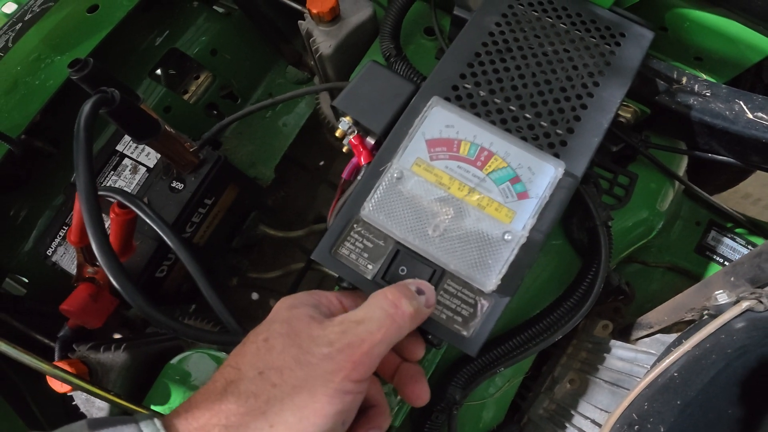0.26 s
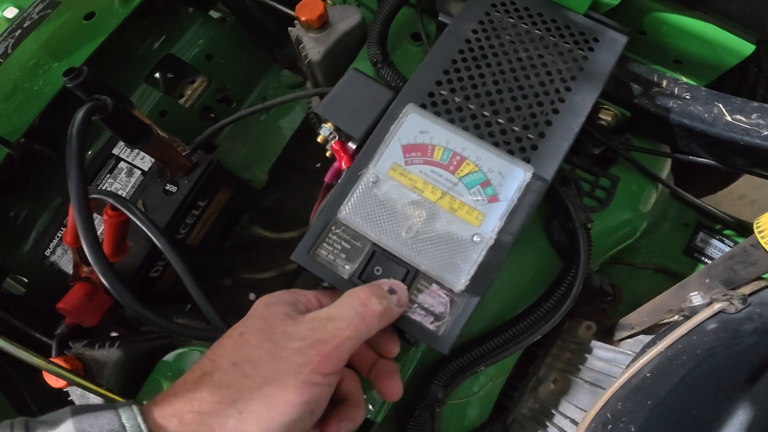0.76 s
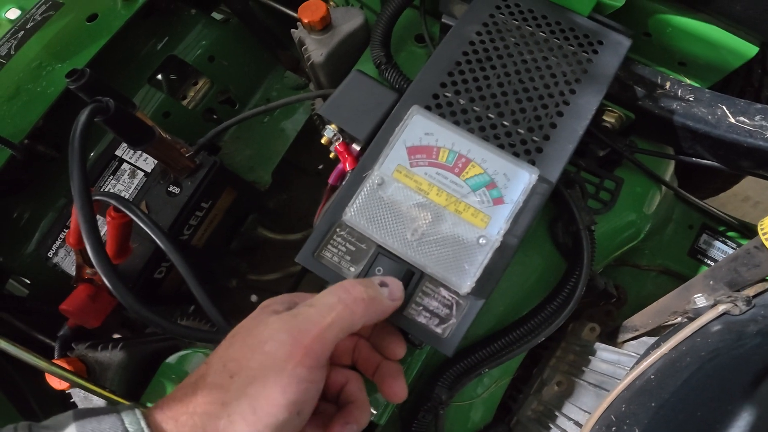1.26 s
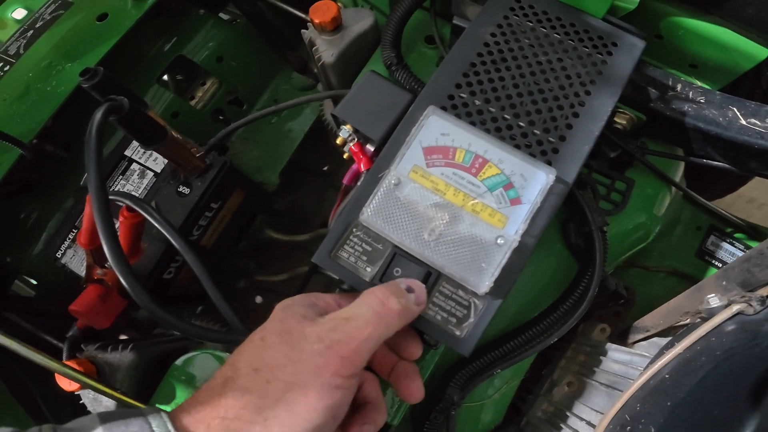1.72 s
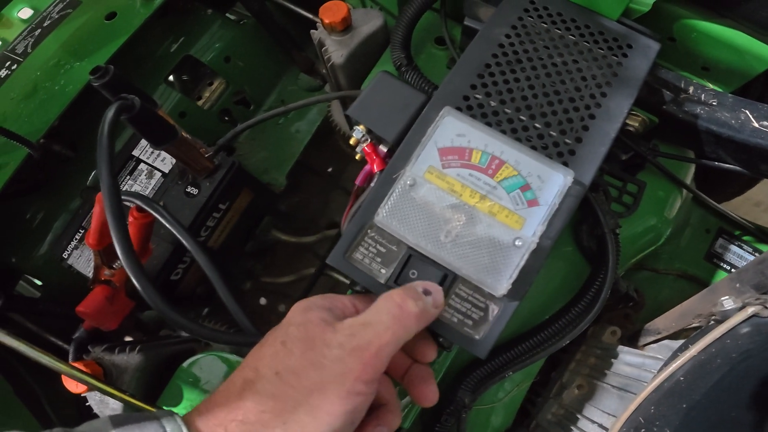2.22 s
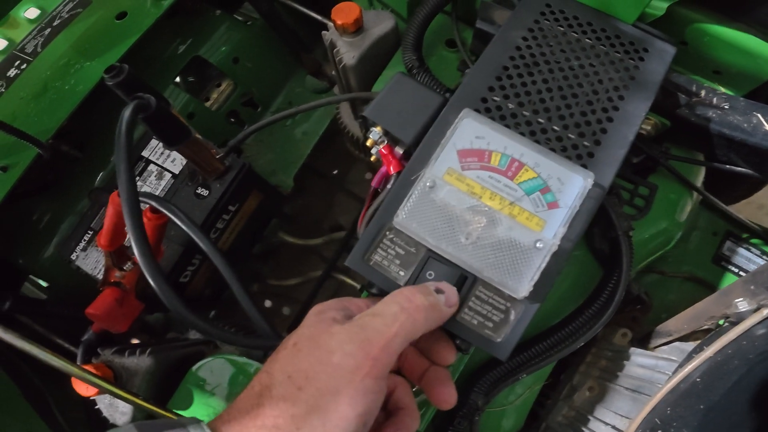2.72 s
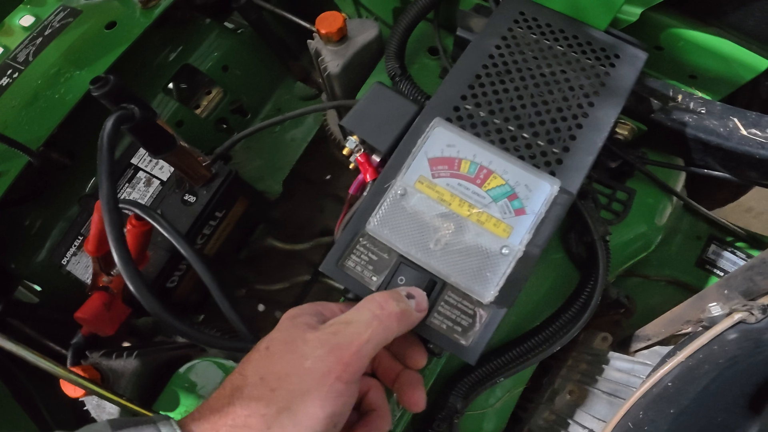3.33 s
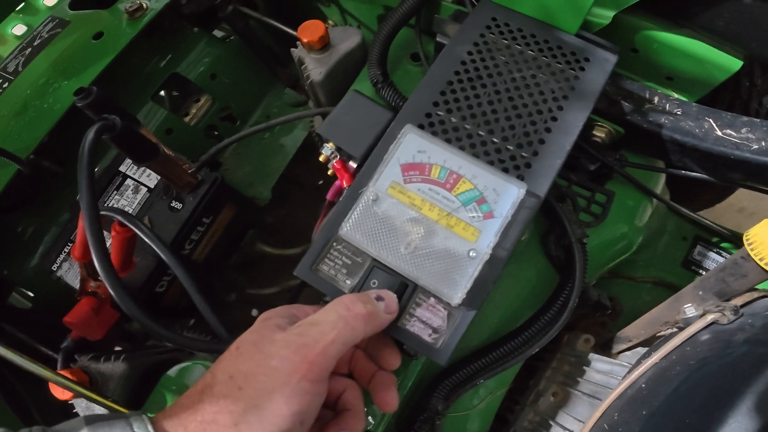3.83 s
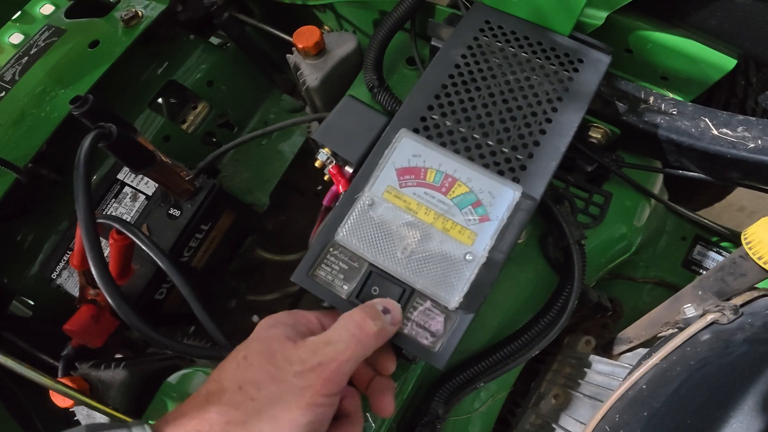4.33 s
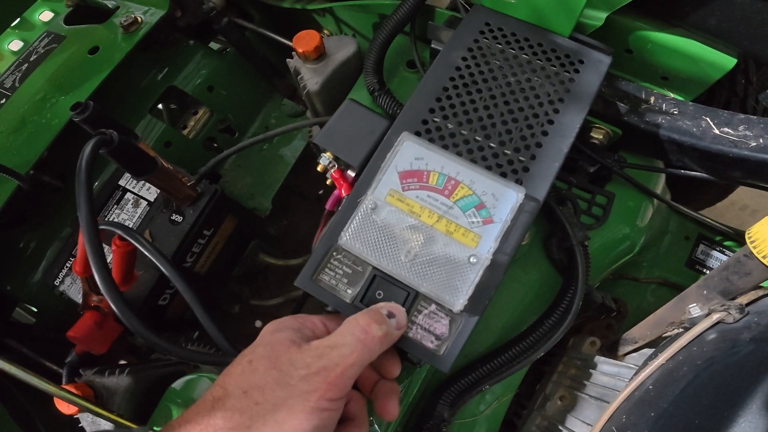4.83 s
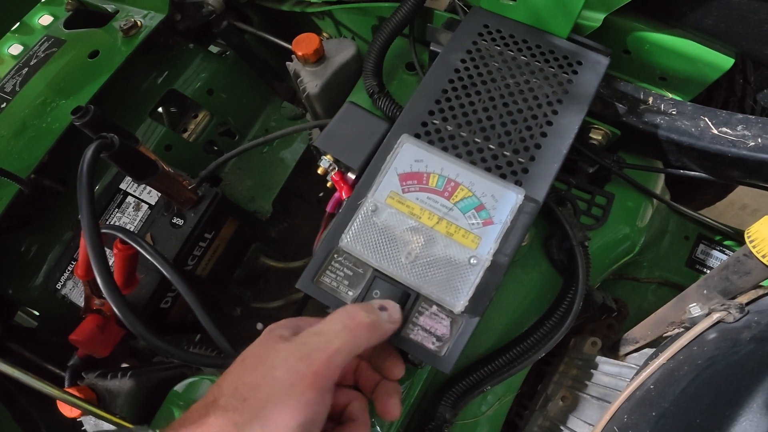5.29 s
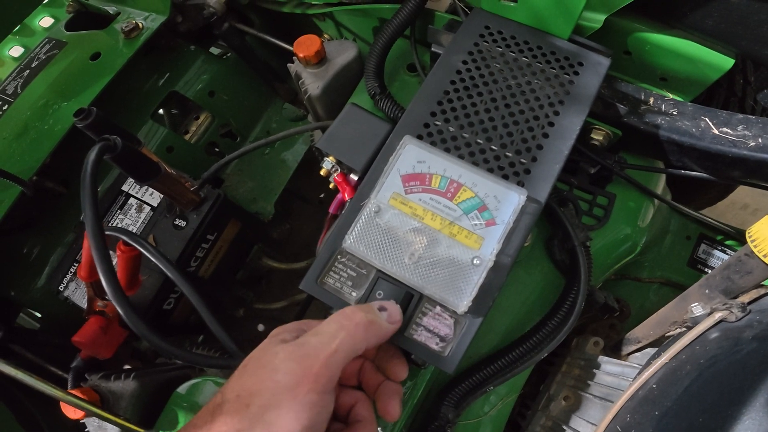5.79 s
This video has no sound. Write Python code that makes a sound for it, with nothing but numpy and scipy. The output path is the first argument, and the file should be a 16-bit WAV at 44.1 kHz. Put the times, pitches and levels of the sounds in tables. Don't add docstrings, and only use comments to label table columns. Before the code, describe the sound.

At 0 s a relay clack is already dying, its thin sheet metal ringing over a quiet garage's low rumble, soft hiss and a faint low machine hum that fades within about three seconds. Tiny thumb taps follow at 0.2 s. At 0.97 s the rocker thumps the hollow case, and about 40 ms later its contacts snap sharply and bounce. Light touches, low soft camera bumps and a brief skin rub at 1.6-1.85 s lead to a tick and a bright, ringing relay clack at 1.87 s. A second thump and snap come at 2.26-2.3 s, with small taps and creaks after. Rubbing from 4.1 s ends in another tick and clack at 4.27 s. Near quiet returns until 5.33 s, when a hurried press thumps, snaps almost at once and chatters. A faint tap at 5.6 s and a soft bump at 5.84 s close it. Close, dry stereo with slight room echo.

```python
import sys
import numpy as np
from scipy import signal
from scipy.fft import rfft, irfft
from scipy.io import wavfile
from scipy.ndimage import uniform_filter1d

SR = 44100
rng = np.random.default_rng(int(sys.argv[2]) if len(sys.argv) > 2 else 0)


def dump_mix(stems):
    frames = np.atleast_2d(stems).T
    limited = np.clip(frames, -1, 1)
    pcm = np.round(limited * 32767).astype(np.int16)
    wavfile.write(sys.argv[1], SR, pcm)


def invert_db(level):
    return 10 ** (np.asarray(level, dtype=float) / 20)


N = 266893

# t/s, peak level/dB, long ring level/dB, ring tilt/(dB per octave)
CLACKS = [
    (-.013, -11.5, -22.5, 1.4),
    (1.8684, -12.5, -23, -0.77),
    (4.2708, -13.5, -21.5, -0.65),
]
RATTLE_DB = {"thump": -32, "snap": -27, "clack": -23}


def evened(x):
    return x / np.sqrt(np.mean(x ** 2) + 1e-20)


def read(points, hz):
    f, value = np.transpose(points)
    return np.interp(np.log(hz + 1), np.log(f + 1), value)


def coloured(x, points):
    hz = np.fft.rfftfreq(len(x), 1 / SR)
    return irfft(rfft(x) * invert_db(read(points, hz)), len(x))


def add(mix, s, sound):
    at = round(s * SR)
    sound = sound[max(-at, 0):]
    part = mix[max(at, 0):][:len(sound)]
    part += sound[:len(part)]


def ring(modes, t, tilt_db=0):
    total = 0
    for k, (hz, db, t60) in enumerate(modes):
        fade = invert_db(db + tilt_db * np.log2(hz / 3000) - 60 * t / t60)
        total = total + (-1) ** k * fade * np.sin(2 * np.pi * hz * t)
    return total


def cracking(noise, crack, rattle_s, crack_t60, treble_t60, u):
    after = np.maximum(u - .5 * rattle_s, 0)
    noise = evened(coloured(noise, crack))
    bass = signal.lfilter(*signal.butter(2, 4500, fs=SR), noise)
    return bass * invert_db(-60 * after / crack_t60) + (noise - bass) * invert_db(-60 * after / treble_t60)


def shimmering(wash, wash_db, wash_t60, t):
    # f/Hz, level/(dB per Hz)
    shimmer = [(150, -18.5), (600, 2), (1500, -8), (3500, -1.5), (6000, -8.5), (9000, -6.5), (12500, -13.5),
               (16500, -24)]
    peaky, top_hz, top_t60 = 1.6, 13000, .15
    lines = rfft(wash)
    wash = irfft(lines * abs(lines) ** peaky, len(wash))
    wash = evened(coloured(wash, shimmer)) * invert_db(wash_db - 60 * t / wash_t60)
    dull = signal.sosfiltfilt(signal.butter(6, top_hz, fs=SR, output="sos"), wash)
    return dull + (wash - dull) * invert_db(-60 * t / top_t60)


def blows(rows, modes, rings, crack, crack_t60, treble_t60, rattle_db, rise_s, wash_db, wash_t60):
    out, t = np.zeros(N), np.arange(SR * 3 // 4) / SR
    u = t[:4096]
    short = ring(modes, u) * (1 - np.exp(-u / rise_s))
    for (s, db, rattle_s, crack_db, ring_db, tilt_db), long_modes in zip(rows, rings):
        rattle, noise = rng.standard_normal((2, 4096))
        contact = invert_db(rattle_db - 20 * u / max(rattle_s, 1e-4)) * rattle
        contact[0] = 1
        body = signal.fftconvolve(short, contact)[:4096]
        burst = cracking(noise, crack, rattle_s, crack_t60, treble_t60, u)
        lasting = ring(long_modes, t, tilt_db)
        lasting[:16384] += shimmering(rng.standard_normal(16384), wash_db, wash_t60, t[:16384])
        sound = invert_db(ring_db) * lasting * (1 - np.exp(-t / 0.0038))
        sound[:4096] += body / abs(body).max() + invert_db(crack_db - 6) * burst * np.minimum(u / .0005, 1)
        add(out, s, invert_db(db) * sound)
    return out


def clacks():
    # f/Hz, level/dB, t60/s
    relay = [(150, -21.5, .1), (195, -19.5, 0.11), (620, -11, .12), (1438, -6, 0.048), (1497, -9.5, .08),
             (1606, -13.5, 0.15), (2500, -3, .035), (3510, 4, 0.028), (4192, -3, 0.021), (8220, -7.5, .02),
             (9800, 4, .02), (12500, -6.5, 0.029)]
    # f/Hz, t60/s, level/dB for each clack
    relay_ring = [(615, 0.095, -1, -5.5, -3), (1340, 0.43, -6.5, -7, -14), (1488, .16, -15, -12, -16.5),
                  (2490, .3, -6, -26, -24.5), (2547, 1.2, -39, -42, -33), (3990, .28, -29, -30, -20),
                  (4185, 0.31, -14, -11, -15), (5805, .25, -36, -35, -23.5), (6230, .4, -30, -24, -30),
                  (6795, 0.42, -37, -28, -28), (7144, .6, -31, -32.5, -27), (7392, 0.61, -22, -19, -17.5),
                  (8183, 0.16, -19.5, -25.5, -30.5), (8760, .3, -17.5, -19.5, -13),
                  (8900, 0.45, -28, -19.5, -20)]
    # f/Hz, t60/s, level/dB for each clack
    relay_pair = [
        (3470, .26, -21, -21, -19),
        (3553, .34, -13, -13, -22),
    ]
    # f/Hz, level/(dB per Hz)
    relay_crack = [(150, -17.5), (1500, -6), (2400, -2.5), (3500, -1.5), (6000, -6.5), (9700, -2),
                   (11500, -9), (14000, -15), (15800, -11), (17000, -22)]
    metal = sorted(relay_ring + relay_pair)
    rings = [[(hz, dbs[k], t60) for hz, t60, *dbs in metal] for k in range(len(CLACKS))]
    rattle_s = .0028
    rows = [(s, db, rattle_s, 0, ring_db, tilt_db) for s, db, ring_db, tilt_db in CLACKS]
    return blows(rows, relay, rings, relay_crack, crack_t60=0.064, treble_t60=0.036,
                 rattle_db=RATTLE_DB["clack"], rise_s=0.00026, wash_db=-11, wash_t60=0.31)


def air():
    # f/Hz, level/(dB per Hz)
    quiet = [(10, -30.5), (25, -11), (45, 0.5), (80, -12.5), (130, -16.5), (200, -25.5), (300, -33),
             (1000, -41.5), (2500, -46), (4800, -44), (6500, -53), (9000, -56.5), (10300, -61),
             (11500, -85)]
    # f/Hz, correlation
    likeness = [(30, .55), (70, .6), (150, .65), (300, .25), (600, .05), (15000, .05)]
    # f/Hz, level/dB
    lean = [(60, -2), (180, 0.5), (550, 0), (1650, 1), (4970, 2.5), (15000, 1.5)]
    rumble_db, hiss_db = -59, -74.5
    frames, hz = N // 512 + 5, np.fft.rfftfreq(2048, 1 / SR)
    a, b, c, d, patches = rng.standard_normal((frames, 1025, 5)).T
    patches = evened(uniform_filter1d(uniform_filter1d(patches, 20, 0), 6, 1))
    low = 1 / (1 + (hz[:, None] / 220) ** 4)
    shape = invert_db(read(quiet, hz))[:, None]
    same, left = np.clip(read(likeness, hz), -1, 1)[:, None], a + 1j * b
    right = same * left + np.sqrt(1 - same ** 2) * (c + 1j * d)
    z = np.array([left, right]) * invert_db(.7 * patches)
    z *= shape * invert_db(np.multiply.outer([.5, -.5], read(lean, hz)))[:, :, None]
    rumble = evened(signal.istft(z * low, nperseg=2048, noverlap=1536)[1][:, :N])
    hiss = evened(signal.istft(z * (1 - low), nperseg=2048, noverlap=1536)[1][:, :N])
    return rumble * invert_db(rumble_db) + hiss * invert_db(hiss_db)


def hum():
    hum_hz, rise_s, rise_db = 146, .1, 7
    start_db, fade_db_per_s, rest_db = -58.5, 5, -75.5
    t = np.arange(N) / SR
    db = np.maximum(start_db - fade_db_per_s * t, rest_db) - rise_db * np.maximum(1 - t / rise_s, 0)
    waver = uniform_filter1d(rng.standard_normal((2, N)), 2500, 1)
    waver = evened(uniform_filter1d(waver, 2500, 1))
    turn = 2 * np.pi * np.cumsum(hum_hz + 4.1 * waver[0]) / SR
    swell_db = 2.2 * waver[1]
    return invert_db(db + swell_db) * np.sin(turn)


def touches():
    # t/s, tone level/dB, tone f/Hz, crack level/dB, crack centre f/Hz
    taps_and_creaks = [(.185, -68, 880, -61.5, 2500), (.235, -63, 700, -73, 1500),
                       (1.197, -53.5, 808, -63, 1400), (1.423, -64.5, 558, -76, 1000),
                       (1.72, -63, 2960, -69, 4500), (1.7474, -42.5, 496, -55, 1103),
                       (1.803, -70, 3580, -81, 3000), (1.819, -59, 804.6, -71, 3000),
                       (2.506, -59, 600, -75, 1196), (2.5513, -53, 887, -47.5, 1900),
                       (2.955, -71.5, 3280, -82.5, 3360), (3.277, -79.5, 5050, -67, 6400),
                       (3.591, -69, 525, -74, 1514), (4.12, -69, 2960, -83, 3060),
                       (4.233, -65, 3070, -66, 2500), (5.305, -69, 630, -73, 5000),
                       (5.603, -62.5, 594, -66, 896)]
    beside = (.78, 1.31)
    base_t60, firm_db, doubling_db = .055, -62, 21
    out, t = np.zeros(N), np.arange(6000) / SR
    for s, db, hz, crack_db, crack_hz in taps_and_creaks:
        t60 = base_t60 * 2 ** ((db - firm_db) / doubling_db)
        cluster = [(hz * beside[0], -9, t60 * .7), (hz, 0, t60 * 1.05), (hz * beside[1], -7, t60 * .7)]
        tones = ring(cluster, t)
        hump = [(crack_hz / 8, -30), (crack_hz / 1.4, -4), (crack_hz, 0),
                (crack_hz * 2.2, -8), (crack_hz * 4, -26), (crack_hz * 8, -50)]
        noise = evened(coloured(rng.standard_normal(6000), hump))
        dull = signal.lfilter(*signal.butter(2, 3500, fs=SR), noise)
        crack = invert_db(crack_db - 60 * t / t60) * (dull + (noise - dull) * invert_db(-60 * t / .09))
        add(out, s, (invert_db(db) * tones + crack) * np.minimum(t / .0012, 1))
    return out


def thumps():
    # t/s, peak level/dB, rattle length/s, long ring level/dB, ring tilt/(dB per octave)
    landings = [
        (0.9724, -15, .012, -32.5, 7),
        (2.2639, -15, 0.0061, -31, 6.5),
        (5.3351, -15.5, 0.0031, -30, -1.5),
    ]
    rebound = (5.369, -25, -0.0654, -22.5, -4)
    # f/Hz, level/dB, t60/s
    case = [(169.5, -16, .14), (348.5, -25, 0.15), (458.3, -14, 0.18), (631.4, -0.5, .085), (700, -4, 0.08),
            (771, -6, 0.08), (1031, -8, 0.094), (905, -7, 0.092), (1324, -14, 0.036), (1465, -9, 0.092),
            (2510, -22.5, 0.044), (4584, -17, 0.032), (6300, -12, 0.011)]
    # f/Hz, level/dB, t60/s
    case_ring = [(635, 0, .22), (762, -9, .38), (1400, -13, .22), (1610, -16, .44), (4172, -18, .14),
                 (6300, -24, .25), (8166, -26, .2)]
    # f/Hz, level/(dB per Hz)
    case_crack = [(150, -30), (700, -11), (1500, 0.5), (3000, -6.5), (4600, -2), (6500, 0), (10500, -17.5),
                  (12600, -10), (14200, -14.5), (15800, -16), (17000, -30.5)]
    crack_db = -7.5
    graze_lead_s, graze_db, graze_rattle_s, graze_ring_db = .0032, -14, .003, -28
    rows = []
    for s, db, rattle_s, ring_db, tilt_db in landings + [rebound]:
        rows.append((s, db, rattle_s, crack_db, ring_db, tilt_db))
    for s, db, *_ in landings:
        rows.append((s - graze_lead_s, db + graze_db, graze_rattle_s, crack_db, graze_ring_db, 0))
    return blows(rows, case, [case_ring] * len(rows), case_crack, crack_t60=0.094, treble_t60=.03,
                 rattle_db=RATTLE_DB["thump"], rise_s=0.00089, wash_db=-18, wash_t60=0.33)


def snaps():
    # t/s, peak level/dB, crack level/dB against the modes, long ring level/dB, gap to the bounce/s
    closings = [
        (1.0156, -14, -4.5, -33, .0249),
        (2.3028, -14, -1, -31.5, .0229),
        (5.3524, -12, -.5, -29, .0126),
    ]
    # t/s, peak level/dB, crack level/dB, long ring level/dB
    chatter = [
        (5.359, -26, 3, -44),
        (5.3835, -40, -11.5, -29.5),
    ]
    # lead t/s, level/dB against the clack, crack level/dB, long ring level/dB
    parting = [
        (.0088, -16.5, -1, -34.5),
        (.0074, -11, -7, -36),
    ]
    # f/Hz, level/dB, t60/s
    rocker = [(971, -16, 0.093), (1764, -13, 0.048), (2942, 2, 0.028), (3260, -11.5, .04),
              (4305, -10, 0.032), (4848, -12, 0.017), (6490, -10.5, 0.026), (8130, -7, 0.015),
              (9020, -2, 0.023), (11540, -11, .012), (13050, -12.5, 0.016)]
    # f/Hz, level/dB, t60/s
    spring_ring = [(1612, -12, .46), (2940, -13, .28), (3090, -13, .3), (3560, -14, .3), (4250, -18, .25),
                   (4620, -17, .26), (6300, -21, .25), (7050, -22, .28)]
    # f/Hz, level/(dB per Hz)
    rocker_crack = [(150, -21), (1000, -2.5), (2200, -7.5), (3000, -2.5), (4000, -6), (6500, -6),
                    (9000, -1.5), (10800, -12.5), (12500, -4), (14300, -17.5), (15800, -15), (17000, -26)]
    meet_lead, meet_db, meet_ring_db = .41, -12.5, -32
    bounce_db, bounce_ring_db, light_crack_db = -13, -31, 1.5
    rattle_s = 0.0037
    hits = list(chatter)
    for s, db, crack_db, ring_db, gap_s in closings:
        hits.append((s - meet_lead * gap_s, db + meet_db, light_crack_db, meet_ring_db))
        hits.append((s, db, crack_db, ring_db))
        hits.append((s + gap_s, db + bounce_db, light_crack_db, bounce_ring_db))
    for s, db, *_ in CLACKS:
        if s > 0:
            for lead_s, under_db, crack_db, ring_db in parting:
                hits.append((s - lead_s, db + under_db, crack_db, ring_db))
    rows = [(s, db, rattle_s, crack_db, ring_db, 0) for s, db, crack_db, ring_db in hits]
    return blows(rows, rocker, [spring_ring] * len(rows), rocker_crack, crack_t60=0.051, treble_t60=.025,
                 rattle_db=RATTLE_DB["snap"], rise_s=.0006, wash_db=-7, wash_t60=0.29)


def bumps():
    # t/s, level/dB, f/Hz, length/s
    pushes = [
        (1.58, -58, 101, 0.075),
        (1.745, -52, 172, 0.05),
        (1.763, -44, 57, 0.053),
        (5.841, -47.5, 106.4, 0.076),
    ]
    out = np.zeros(N)
    for s, db, hz, length in pushes:
        t = np.arange(0, length, 1 / SR)
        add(out, s, invert_db(db) * np.sin(2 * np.pi * hz * t) * np.hanning(len(t)))
    return out


def rubs():
    strokes = [
        (1.7, 1.73, -71),
        (1.779, 1.855, -61),
        (4.08, 4.25, -62),
        (5.279, 5.327, -63),
    ]
    swell_db, bend, release_db_per_s = 24, .6, 170
    grain = invert_db(4 * evened(uniform_filter1d(rng.standard_normal(N), 150)))
    skin = [(200, -8), (700, 12), (2000, -4.5), (3200, 1.5), (6000, -16.5), (9000, -12.5),
            (13000, -24.5), (16000, -44)]
    noise = evened(grain * coloured(rng.standard_normal(N), skin))
    t, press = np.arange(N) / SR, np.zeros(N)
    for start, slip, db in strokes:
        to_go = np.clip((slip - t) / (slip - start), 0, 1)
        release_db = release_db_per_s * np.maximum(t - slip, 0)
        press += (t > start) * invert_db(db - swell_db * to_go ** bend - release_db)
    return noise * press


def spread(x):
    # f/Hz, level/dB
    side_spectrum = [(60, -4), (150, -16), (380, -21), (950, -23), (2380, -17), (5980, -8.5), (15000, -6)]
    echoes = rng.standard_normal(768) * np.exp(-np.arange(768) / 130)
    side = signal.oaconvolve(x, echoes / np.linalg.norm(echoes))[:N]
    side = coloured(side, side_spectrum)
    return np.array([x + side, x - side])


def garage(x):
    # f/Hz, t60/s
    room_decay = [(200, 0.43), (1000, 0.16), (4000, 0.1), (10000, 0.051), (16000, 0.049)]
    taps = np.zeros((2, SR // 2))
    at = np.arange(200, SR // 2 - 20, 20) + rng.integers(0, 20, (2, (SR // 2 - 201) // 20))
    np.put_along_axis(taps, at, rng.choice([-1., 1.], at.shape), 1)
    taps = taps + 1.3 * taps[::-1]
    hz, t, z = signal.stft(taps, SR, nperseg=256)
    tail = signal.istft(z * invert_db(-60 * t / read(room_decay, hz)[:, None]), SR, nperseg=256)[1]
    return signal.fftconvolve(x[None], tail / np.linalg.norm(tail[0]), axes=1)[:, :N]


def scene():
    body_low_hz, garage_db = 118, -18
    tester = clacks() + touches() + thumps() + snaps() + rubs()
    tester = signal.sosfilt(signal.butter(4, body_low_hz, "high", fs=SR, output="sos"), tester)
    return spread(tester) + invert_db(garage_db) * garage(tester) + bumps() + hum() + air()


def low_pass(x):
    return signal.sosfilt(signal.butter(12, 16880, fs=SR, output="sos"), x)


def record(dry):
    mic_top_hz = 16100
    heard = signal.oaconvolve(dry, signal.firwin(255, mic_top_hz, fs=SR)[None], "same")
    return low_pass(heard)


dry = scene()
out = record(dry)
dump_mix(out)
```